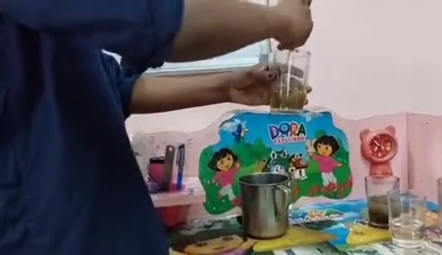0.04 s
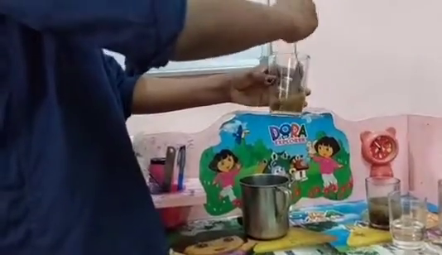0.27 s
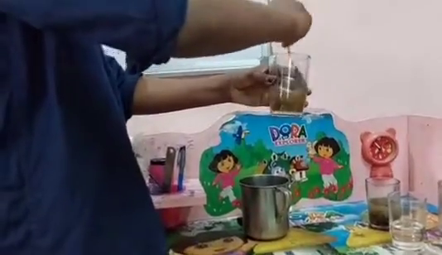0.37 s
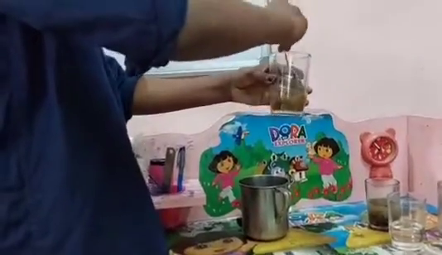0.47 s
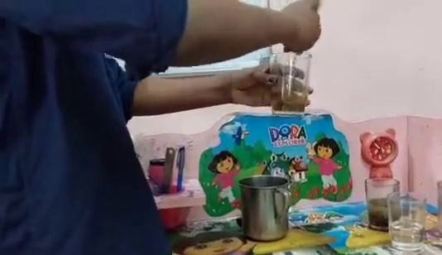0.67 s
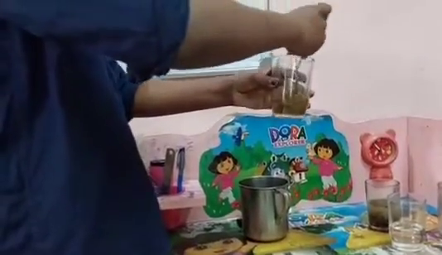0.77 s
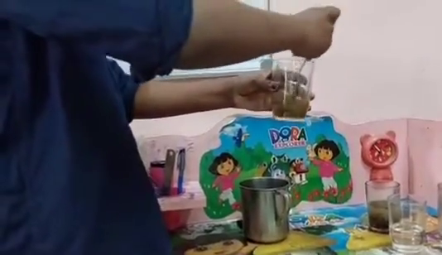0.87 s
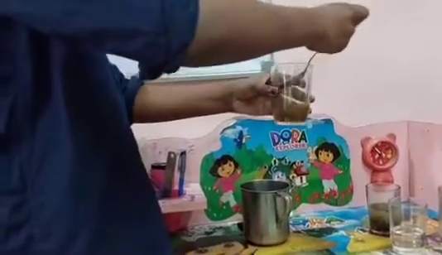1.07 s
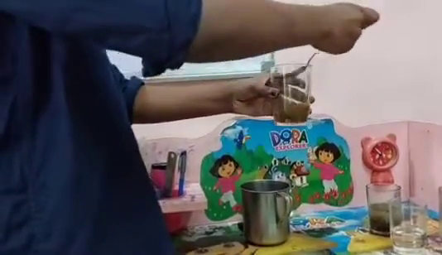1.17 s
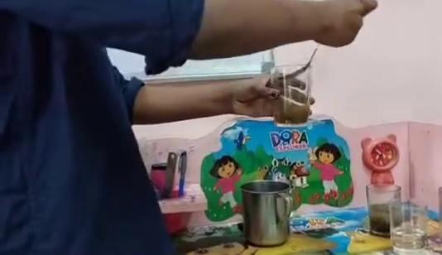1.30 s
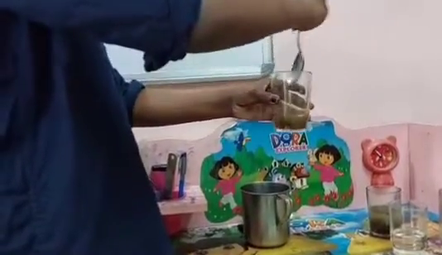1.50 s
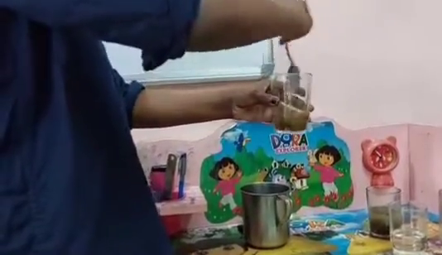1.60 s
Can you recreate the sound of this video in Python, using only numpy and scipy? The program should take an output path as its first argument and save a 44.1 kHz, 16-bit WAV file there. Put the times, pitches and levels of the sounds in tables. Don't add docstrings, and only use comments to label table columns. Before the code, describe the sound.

Spoon clinking in a glass tumbler of wet sand, gritty scrapes and brighter rim clinks, then quiet.

```python
import sys
import numpy as np
from scipy import signal
from scipy.fft import rfft, irfft, next_fast_len
from scipy.io import wavfile
from scipy.ndimage import map_coordinates

SR = 44100
rng = np.random.default_rng(int(sys.argv[2]) if len(sys.argv) > 2 else 0)


def wrap_up_sound(samples):
    columns = np.atleast_2d(samples).T
    tamed = np.clip(columns, -1, 1)
    steps = np.round(tamed * 32767).astype(np.int16)
    wavfile.write(sys.argv[1], SR, steps)


def volts_from_db(level):
    exponent = np.asarray(level, float) / 20
    return 10 ** exponent


N = 72765

LEFT_DB = -3
WALL_TRIM_DB = [0.5, 1, 3, 6]
# f/Hz, level/dB, t60/s
WET_LOW = [(1143, 3, 0.02)]


def unit(x):
    return x / np.sqrt(np.mean(x ** 2) + 1e-20)


def along(points, hz):
    f, v = np.transpose(points)
    return np.interp(np.log(hz + 1), np.log(f + 1), v)


def filtered(x, response):
    m = next_fast_len(x.shape[-1] + 8192)
    return irfft(rfft(x, m) * response(np.fft.rfftfreq(m, 1 / SR)), m)[..., :x.shape[-1]]


def wobble(rate):
    knots = rng.standard_normal(int(N / SR * 40) + 4)
    return map_coordinates(knots, [np.arange(N) * min(rate, 39) / SR])


def drift(t):
    slosh_hz = 1.5
    return np.cumsum(rng.standard_normal(len(t))) * np.sqrt(2 * np.pi * slosh_hz / SR)


def heard(x, left_db):
    # f/Hz, t60/s
    room_decay = [(500, 0.31), (2500, 0.23), (7000, 0.25), (15000, 0.24)]
    room_db, likeness, gap_s = 3, 0.045, 0.0031
    wall_s, wall_db = 0.011, -8
    hz, t, z = signal.stft(rng.standard_normal((2, SR // 2)), SR, nperseg=256)
    decay = volts_from_db(-60 * t / along(room_decay, hz)[:, None])
    a, b = signal.istft(z * decay, SR, nperseg=256)[1]
    turn = np.arccos(np.clip(likeness, 0, 1)) / 2
    tail = np.array([np.cos(turn) * a + side * np.sin(turn) * b for side in (1, -1)])
    fade_in = np.clip(np.arange(len(a)) / (gap_s * SR) - 1, 0, 1)
    tail *= volts_from_db(room_db) / np.linalg.norm(tail[0]) * fade_in
    tail[:, 0] += 1
    wall = round(wall_s * SR)
    tail[[0, 1], [wall, wall + 9]] += volts_from_db(wall_db)
    return signal.fftconvolve(x[None], tail, axes=1) * volts_from_db(np.array([[left_db / 2], [-left_db / 2]]))


def place(out, y, s):
    out[:, round(s * SR):][:, :y.shape[1]] += y


def ring(modes, t, attack_s):
    scatter_db = 1.2
    total = 0
    for hz, db, t60 in modes:
        level = volts_from_db(db + scatter_db * rng.standard_normal() - 60 * t / t60)
        total = total + level * np.sin(2 * np.pi * hz * t + drift(t))
    return total * (1 - np.exp(-t / attack_s))


def strikes(rows, families, crack, trim_db, left_db, attack_s=0.00057):
    crack_s = 0.017
    out, t = np.zeros((2, N + 2 * SR)), np.arange(SR // 4) / SR
    for s, db, low_db, upper_db, crack_db in rows:
        noise = filtered(rng.standard_normal(len(t)), lambda hz: volts_from_db(along(crack, hz)))
        burst = unit(noise) * volts_from_db(-60 * t / crack_s) * (1 - np.exp(-t / attack_s))
        parts = [ring(modes, t, attack_s) for modes in families] + [burst]
        levels = volts_from_db(db + np.array([low_db, -12, upper_db, crack_db]) + trim_db)
        place(out, heard(levels @ np.array(parts), left_db), s)
    return out[:, :N]


def air():
    # f/Hz, level/dB per Hz
    spectrum = [(20, -31), (52, -2), (95, -6), (130, -5.5), (330, -4), (600, -12.5), (2000, -14.5),
                (16000, -16)]
    # f/Hz, correlation
    alike = [(30, 0.19), (100, 0.46), (500, 0.47), (3000, 0.1), (12000, 0.97)]
    air_db, settles_db, settles_from_s = -65, -3.5, 1.334

    def mid_side(hz):
        turn = np.arccos(np.clip(along(alike, hz), -1, 1)) / 2
        return volts_from_db(along(spectrum, hz)) * [np.cos(turn), np.sin(turn)]

    mid, side = filtered(rng.standard_normal((2, N)), mid_side)
    settling = np.clip((np.arange(N) / SR - settles_from_s) / 0.16, 0, 1)
    level_db = air_db + 0.35 * wobble(1.15) + settles_db * settling
    balance_db = np.array([[-0.8], [0.8]])
    return unit(np.array([mid + side, mid - side])) * volts_from_db(level_db + balance_db)


def grinding():
    # t/s, length/s, body level/dB, fine grit level/dB, favoured resonance f/Hz
    rubs = [(0, 0.054, -59, -63, 1350), (0.014, 0.03, -60.5, -60, 4900), (0.062, 0.04, -53.5, -64, 2650),
            (0.188, 0.082, -55, -56.5, 2100), (0.242, 0.032, -49.5, -52, 2766),
            (.54, 0.018, -56, -56, 4500), (0.588, 0.035, -54.5, -60, 1110),
            (0.654, 0.067, -54.5, -64, 2830), (0.694, 0.064, -57, -58.5, 2750),
            (0.835, 0.0385, -61.5, -64, 3780), (0.901, 0.077, -59, -61.5, 3300),
            (1.001, 0.055, -48.5, -49, 2430), (1.005, 0.028, -45.5, -65, 14500),
            (0.604, 0.0093, -47, -57, 13800), (1.041, 0.033, -51, -50, 2140),
            (1.075, 0.0834, -54.5, -61, 2420), (1.18, 0.045, -50, -66.5, 2180),
            (1.196, 0.037, -58, -84, 1890), (1.229, 0.023, -44.5, -60, 1900),
            (1.338, 0.0071, -51, -57.5, 854), (0.122, 0.045, -63, -66, 2320),
            (0.49, 0.086, -66.5, -70, 2700), (0.764, 0.084, -64.5, -67, 2700)]
    # f/Hz, width/Hz, level/dB
    resonances = [(1143, 397, 3), (1636, 390, 1), (2100, 520, -0.5), (2700, 855, 4.5), (3900, 420, 1),
                  (4760, 860, -1.5)]
    # f/Hz, level/dB per Hz
    grit = [(5000, -42), (7000, -1.5), (9000, -6.5), (10500, -4), (11800, 5), (13000, -11), (14500, -3),
            (16000, -14)]
    rise_s, fall_s = 0.0024, 0.0037
    favour_db, favour_width = 5.5, 0.1
    spread_db, grains_per_s = 2, 9000
    valley_db = -28
    out, t = np.zeros((2, N + 2 * SR)), np.arange(SR // 5) / SR
    for s, length, body_db, grit_db, favoured_hz in rubs:
        size = (2, len(t))
        force = volts_from_db(spread_db * np.minimum(rng.exponential(size=size), 3))
        grains = force * rng.standard_normal(size) * (rng.random(size) < grains_per_s / SR)
        favoured = (favoured_hz, favour_width * favoured_hz, favour_db + favoured_hz / 1500)
        peaks = list(resonances) + [favoured]

        def body(f):
            total = volts_from_db(valley_db)
            for c, w, db in peaks:
                total = total + volts_from_db(db) * (1j * f * w / (c * c - f * f + 1j * f * w)) ** 2
            return total

        low = unit(filtered(grains[0], body))
        high = unit(filtered(grains[1], lambda hz: volts_from_db(along(grit, hz))))
        stroke = np.clip(t / rise_s, 0, 1) * np.clip((length - t) / fall_s + 1, 0, 1)
        place(out, heard(stroke * (volts_from_db(body_db) * low + volts_from_db(grit_db) * high), LEFT_DB), s)
    return out[:, :N]


def knocks():
    # t/s, peak level/dB, low ring/dB, spoon ring/dB, crack/dB
    rows = [(0.097, -41, -32, -14, -36), (0.2975, -19, -30, -34, -34), (0.287, -14, -25.5, -23, -13.5),
            (0.547, -50.5, 8, 11, -3), (0.607, -48, -23, 10, 3), (0.6575, -56, 2, 10, -10),
            (0.666, -52, 2, 6, -5), (0.701, -42, -16, -14, -22), (0.730, -42, -16, -16, -22),
            (0.844, -60, -5, 5, -5), (0.7415, -38, -18.5, -18, -21), (0.907, -56, -4.5, -5, -8),
            (0.315, -27, -30, -22, -22)]
    # f/Hz, level/dB, t60/s
    wet_main = [(2470, -10.5, 0.05), (2538, -1.5, 0.047), (2726, -2, 0.042), (2830, -9.5, 0.029)]
    # f/Hz, level/dB, t60/s
    spoon = [(3900, -2.5, 0.011), (4500, -1.5, 0.015), (4900, -5, 0.013), (7250, -16.5, 0.021),
             (9400, -39, 0.013), (10700, -12, 0.0059)]
    # f/Hz, level/dB
    crack = [(400, -28), (1900, 2.5), (3300, -0.5), (6000, -2), (9500, 4.5), (12000, 2.5), (14500, -13),
             (16000, -8)]
    return strikes(rows, [WET_LOW, wet_main, spoon], crack, WALL_TRIM_DB, LEFT_DB)


def pings():
    # t/s, f/Hz, level/dB, t60/s, glide/Hz per s
    rows = [(0.239, 7250, -82, 0.16, 18), (0.241, 3906, -54.5, 0.51, 7), (0.256, 2788, -41.5, 0.24, 13),
            (0.658, 2972, -51, 0.21, -800), (0.687, 1120, -48, 0.064, 4), (0.7, 4070, -56, 0.28, -800),
            (0.836, 3810, -55.5, 0.1, 2), (0.951, 4100, -54, 0.21, 7), (1.02, 5360, -55, 0.4, -2500),
            (0.195, 2150, -54.5, 0.22, -1500), (0.2, 1582, -55, 0.31, 2), (1.046, 1153, -34, 0.05, -3),
            (1.084, 1650, -42, 0.1, 694), (1.088, 1735, -42, 0.09, 2), (1.182, 1103, -35.5, 0.059, 4),
            (1.182, 6860, -42.5, 0.077, 2), (1.04, 6815, -45, 0.28, -14), (1.34, 3900, -59, 0.068, 2),
            (1.472, 2765, -50, 0.053, -1),]
    rise_s = 0.002
    out, t = np.zeros((2, N + 2 * SR)), np.arange(SR // 4) / SR
    for s, hz, db, t60, glide in rows:
        swell = volts_from_db(db - 60 * t / t60) * (1 - np.exp(-t / rise_s))
        tone = np.sin(2 * np.pi * (hz + glide * t / 2) * t + drift(t))
        place(out, heard(swell * tone, LEFT_DB), s)
    return out[:, :N]


def thuds():
    # t/s, f/Hz, level/dB, length/s
    rows = [
        (0.268, 333.8, -58, 0.017),
        (0.34, 58.2, -67, 0.066),
        (0.525, 371, -66.5, 0.05),
        (0.598, 47.3, -64, 0.1),
        (1.029, 373, -64.5, 0.052),
        (1.04, 48, -68, 0.051),
        (1.185, 62, -80, 0.032),
    ]
    t = np.arange(N) / SR
    total = np.zeros(N)
    for s, hz, db, length in rows:
        swell = np.sin(np.pi * np.clip((t - s) / length, 0, 1)) ** 2
        total += volts_from_db(db) * swell * np.sin(2 * np.pi * hz * t)
    return total * np.ones((2, 1))


def taps():
    # t/s, peak level/dB, low ring/dB, upper ring/dB, crack/dB
    rows = [
        (.4222, -18.5, -51, -32, -22.5),
        (.4335, -31, -23, -32, -22),
        (1.553, -74, -26, -26, 13.5),
    ]
    # f/Hz, level/dB, t60/s
    tap_main = [(1900, -3, 0.0091), (2310, 7, 0.0063), (2660, -2.5, 0.025)]
    # f/Hz, level/dB, t60/s
    tap_upper = [(4590, 2.5, 0.01), (7160, 5, 0.022), (11570, 10.5, 0.015)]
    # f/Hz, level/dB
    crack = [(1000, -60), (3000, -2.5), (5000, -1.5), (7500, 2), (10000, -3), (16000, -8)]
    return strikes(rows, [WET_LOW, tap_main, tap_upper], crack, WALL_TRIM_DB, LEFT_DB)


def clinks():
    # t/s, peak level/dB, low ring/dB, upper ring/dB, crack/dB
    rows = [
        (1.0412, -24, -37, -22.5, -11.5),
        (1.053, -34.5, -25, -14.5, 3),
        (1.182, -27.5, -19, -27, -2),
        (1.2352, -19.5, -17.5, -25.5, -21),
        (1.253, -27, -19, -46, -32),
        (1.295, -47, -20, -39, -22),
        (1.339, -46, 0.5, -23, -44),
        (1.3425, -45.5, -13, -11.5, -23),
        (1.452, -46.5, -8.5, -48, -37),
        (1.474, -49, -36.5, -15.5, -6.5),
    ]
    # f/Hz, level/dB, t60/s
    rim_low = [(956, -0.5, 0.037), (1006, -1, 0.11)]
    # f/Hz, level/dB, t60/s
    rim_main = [(2620, -6.5, 0.068), (2700, -8.5, 0.094), (2844, -1.5, 0.1), (2885, -3, 0.094),
                (2976, -8, 0.089), (3284, -21, 0.053)]
    # f/Hz, level/dB, t60/s
    rim_upper = [(6334, 3, 0.021), (6623, 7, 0.027), (6724, 0, 0.036), (11730, -8, 0.044)]
    # f/Hz, level/dB
    crack = [(300, -57), (1000, -10.5), (2200, 14), (3800, -1), (5500, -10), (9000, -11), (16000, -17)]
    trim_db = [-3.5, 4.5, 7.5, 2.5]
    return strikes(rows, [rim_low, rim_main, rim_upper], crack, trim_db, left_db=0.5, attack_s=0.00091)


def radiated(x):
    # f/Hz, level/dB
    tone = [(200, 2.5), (600, 4.5), (1000, -1)]
    return filtered(x, lambda hz: volts_from_db(along(tone, hz)))


def scene():
    glass = grinding() + knocks() + pings() + taps() + clinks()
    return air() + radiated(glass) + thuds()


def low_pass(x):
    return signal.sosfilt(signal.butter(12, 16660, fs=SR, output="sos"), x)


def record(dry):
    limited = filtered(dry, lambda hz: np.where(hz < 15700, 1, volts_from_db(-30) * (hz < 16600)))
    return low_pass(limited)


dry = scene()
out = record(dry)
wrap_up_sound(out)
```